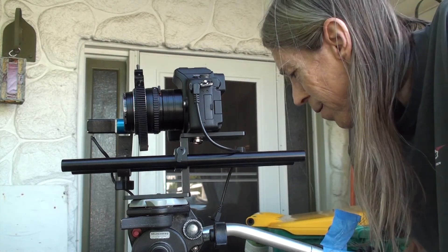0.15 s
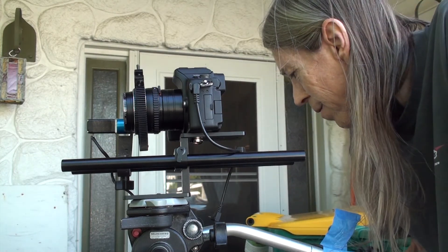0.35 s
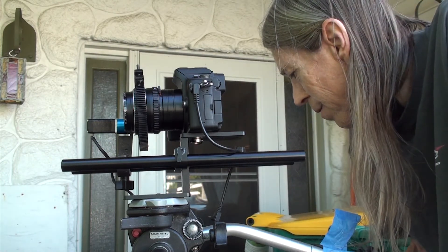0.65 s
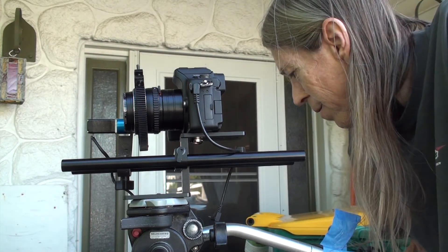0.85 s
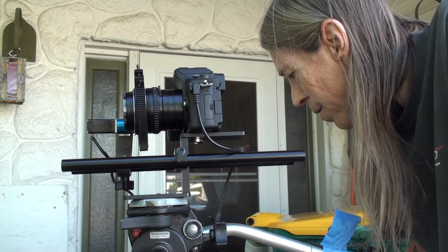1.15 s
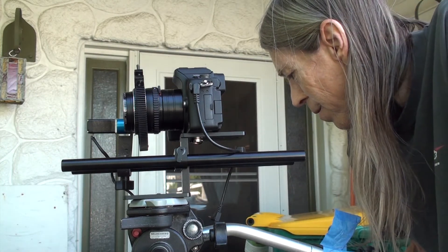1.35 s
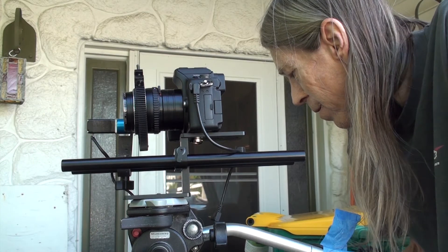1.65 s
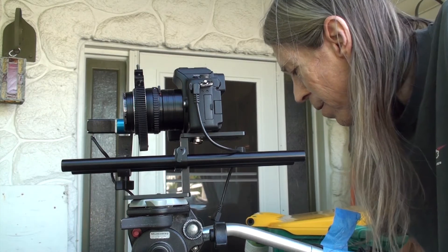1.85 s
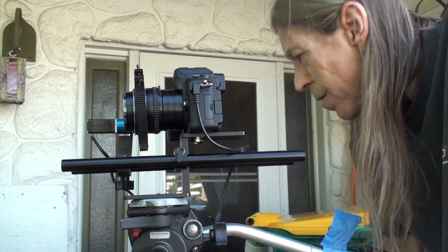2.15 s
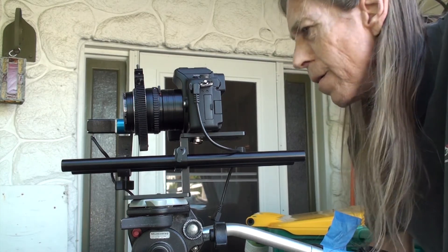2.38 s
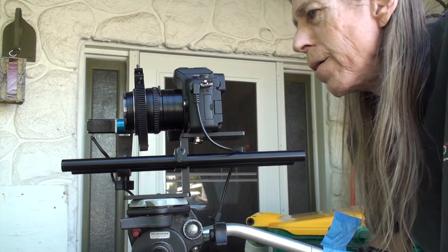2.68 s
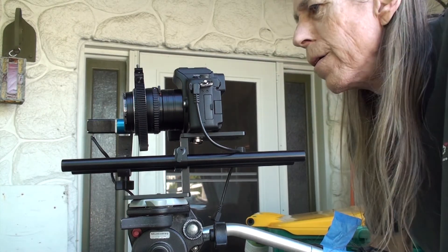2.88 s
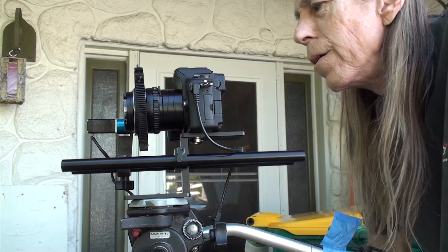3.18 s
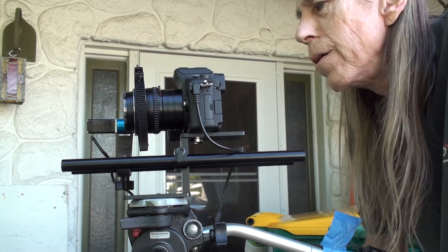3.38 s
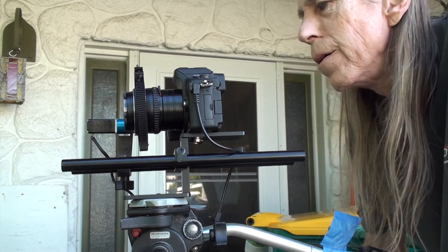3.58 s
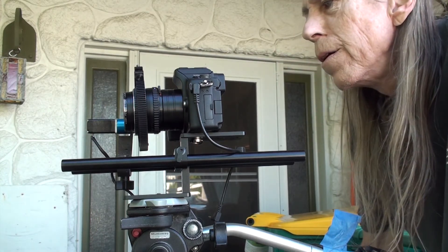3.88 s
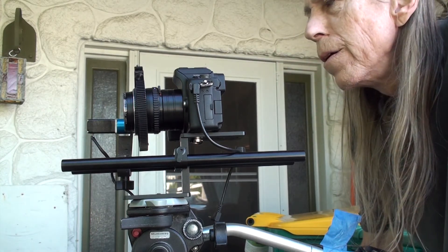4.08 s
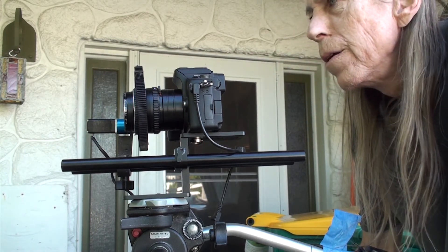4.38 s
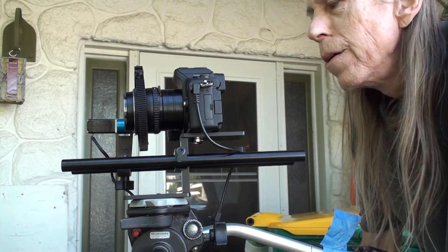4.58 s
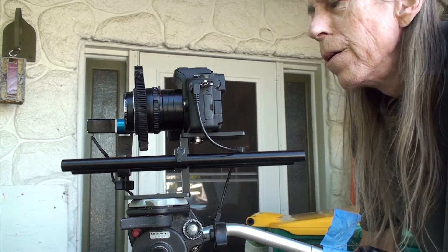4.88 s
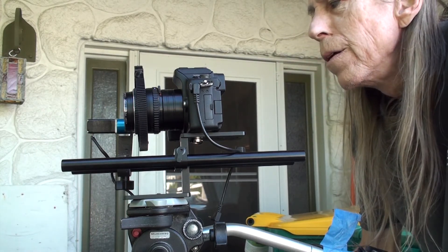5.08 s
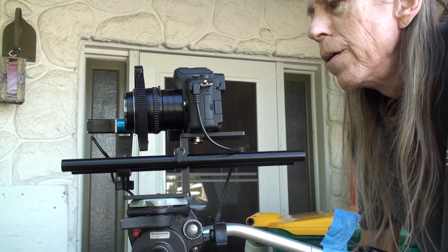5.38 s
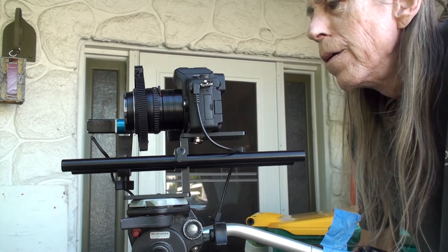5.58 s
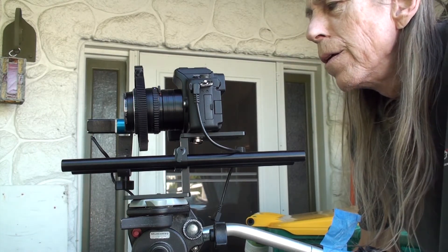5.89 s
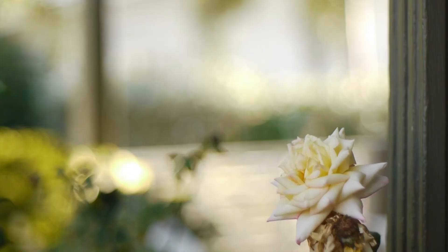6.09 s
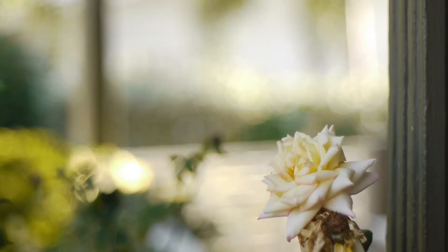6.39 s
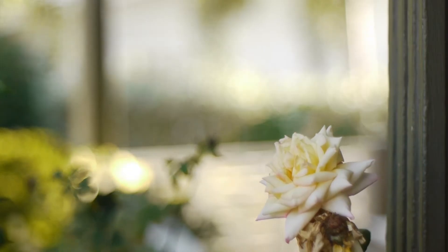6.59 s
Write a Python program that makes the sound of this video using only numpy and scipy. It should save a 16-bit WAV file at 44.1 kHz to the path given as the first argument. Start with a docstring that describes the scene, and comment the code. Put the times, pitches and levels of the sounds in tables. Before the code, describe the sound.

Two small button clicks close by, then a stepper motor whirs with a buzzing, ratcheting whine against soft outdoor air, stopping dead.

```python
"""Lens focus motor on a porch

Close up in stereo, a small button clicks twice; its spring snaps, its case knocks and a near wall answers.
Then a stepper motor turns the focus ring of a camera lens, 52 steps a second. The rig hums on multiples of
that rate, and each step knocks the gear teeth, which rebound in their play and ring the lens barrel.
Outdoor air, puffs of breeze and a faint distant whine of wavering tones lie behind; all stops at once."""
import sys
import numpy as np
from scipy import signal
from scipy.fft import rfft, irfft, next_fast_len
from scipy.io import wavfile
from scipy.ndimage import map_coordinates

SR = 44100
rng = np.random.default_rng(int(sys.argv[2]) if len(sys.argv) > 2 else 0)


def dump_mix(stems):
    """Bounce the given channels to the path in sys.argv[1] as a 16-bit WAV at rate SR."""
    frames = np.atleast_2d(stems).T  # one column per channel
    limited = np.clip(frames, -1, 1)  # hard clip at full scale
    pcm = np.round(limited * 32767).astype(np.int16)
    wavfile.write(sys.argv[1], SR, pcm)


N = 297480

# outdoor hiss spectrum: (frequency [Hz], relative level [dB])
AIR_SPECTRUM = [(20, -14.5), (55, 0.5), (115, 0), (230, -6), (480, -7.5), (900, -8.5), (1300, -13),
                (3000, -16), (6900, -17), (9000, -22), (10800, -27), (11700, -24), (13200, -26.5),
                (14200, -36)]
# low outdoor rumble spectrum: (frequency [Hz], relative level [dB])
RUMBLE_SPECTRUM = [(20, -14.5), (52, 5.5), (80, 0.0), (160, -41)]
# faint distant tones: (frequency [Hz], level [dB], rate of wavering [knots/s])
WHINE_TONES = [(689.8, -64.5, 9), (676, -65.5, 14), (588, -77.5, 10), (512.6, -73.5, 8), (1498, -76.5, 10),
               (204.2, -72, 8), (151.9, -72, 6), (120.9, -69, 8)]
# puffs of breeze on the microphones: (time [s], length [s], level [dB])
BREEZE_PUFFS = [(1.38, .1, -56.5), (1.65, .06, -57), (3.51, .08, -57), (3.85, 0.16, -64),
                (4.72, .14, -60.5), (5.49, .05, -58), (5.89, .06, -51.5)]
# spectrum of a puff: (frequency [Hz], relative level [dB])
PUFF_SPECTRUM = [(20, -10.5), (52, 5.5), (90, -3), (180, -36)]
# stereo width before each source's own offset: (frequency [Hz], side against mid [dB])
STEREO_WIDTH = [(30, -23.5), (100, -35), (300, -19.5), (700, -13.5), (3000, -10.5), (5500, -20),
                (9000, -17.5), (10800, -2.5), (11700, -47)]
# button going down and coming up: (time [s], snap gain [dB], knock gain [dB])
BUTTON_MOVES = [(0.1140, -31, -40), (0.3825, -70, -39.5), (0.9967, -31.5, -41), (1.1240, -72, -41)]
# modes of the button's spring: (frequency [Hz], relative level [dB], decay by 60 dB [s])
SPRING_MODES = [(3850, -11, .008), (4450, -6, .009), (5130, -2, .008), (5600, -1, .008), (6200, -6, .007),
                (6640, -4, .008), (6945, -1, .01), (10250, -13, .009), (10740, -9.5, .011),
                (11700, -10, .011), (12220, -7.5, .011), (12850, -9, .011)]
# mount throb at twice the step rate: (time [s], level [dB])
MOUNT_THROB = [(2.0, -65.5), (2.79, -63.5), (2.91, -74), (3.59, -54.5), (4.37, -57.5), (5.02, -55),
               (5.14, -61), (6.05, -57)]
# lines of the rig, before load and waver:
# (multiple of the step rate, level in first tone [dB], level in second tone [dB])
RIG_LINES = [(3, -63, -65), (4, -65, -65), (5, -66, -66), (8, -56.5, -57), (9, -59.5, -61.5),
             (10, -63.5, -61), (12, -64.5, -65), (13, -62, -65), (14, -70, -68), (16, -74, -72),
             (20, -72, -72), (23, -72, -72), (25, -73, -60.5), (26, -64, -69), (27, -74, -74),
             (30, -84, -68), (31, -68, -68), (32, -75, -69), (33, -72, -62.5), (34, -71, -68),
             (35, -70, -73), (36, -68, -64), (39, -76, -75), (41, -67, -71), (43, -74, -73), (46, -75, -80)]
# stiffness of the turning ring: (time [s], relative load on the teeth [dB], swell per tooth [dB])
RING_DRAG = [(2.0, -49, 1.5), (2.45, -50.5, -0.5), (2.65, -45.5, 1.5), (3.0, -52, 2.5), (3.21, -48.5, 1.5),
             (3.65, -54, 2.5), (3.99, -57, 3), (4.33, -54, 4.5), (4.46, -51, 2.5), (4.8, -51.5, 1.5),
             (5.0, -51, 3), (5.3, -50, 3.3), (5.42, -49, 0.5), (5.47, -44.5, 0.7), (6.08, -52, -1)]
# the teeth catch and scrape harder: (time [s], length [s], scrape level [dB], extra load [dB])
TOOTH_CATCHES = [(2.138, .09, -54, 4.5), (2.441, .023, -54.5, 1.5), (3.022, .06, -60, 0.5),
                 (3.236, .04, -52.5, 2.5), (3.333, .04, -57.5, 3), (3.68, .09, -58, 3)]
# spectrum of the scrape: (frequency [Hz], relative level [dB])
SCRAPE_SPECTRUM = [(1500, -24.5), (2500, -1), (3100, -10.5), (3600, 0), (4800, -1.5), (5450, 1),
                   (6300, -5.5), (8000, -14.5), (12000, -24)]
# tooth contacts within one step, before scatter: (delay [s], relative strength [dB])
TOOTH_CONTACTS = [(0, 0), (.0037, -3), (.0069, -5), (.0100, -10)]
# resonances of gear and lens barrel:
# (frequency [Hz], width [Hz], relative level in first tone [dB], relative level in second tone [dB])
BARREL_MODES = [(1263, 56, -2.5, 2.5), (1714, 140, -1, -1), (2133, 132, -1, -6), (2595, 73, -6.5, -10),
                (3650, 140, -11.5, -10), (4440, 110, -24, -13), (5330, 110, -9, -20.5)]
# gear resonances pinged by each step: (frequency [Hz], width [Hz], relative level [dB])
PING_MODES = [(3610, 230, 0), (4560, 500, -5.5)]
# spectrum of ticks and rub: (frequency [Hz], relative level [dB])
TICK_SPECTRUM = [(1500, -9.5), (2800, -2.5), (4500, -3.5), (6500, 1), (7900, 1.5), (8600, -6), (10600, -6),
                 (11900, -3), (13300, -7.5), (14200, -27), (16000, -23)]
# spectrum of the ring's thin high rub: (frequency [Hz], relative level [dB])
SIZZLE_SPECTRUM = [(9500, -51.0), (10900, -16), (11400, 0.5), (12300, -4.0), (13800, -40.5)]
# spectrum of the ring's soft grind: (frequency [Hz], relative level [dB])
GRIND_SPECTRUM = [(50, -19.5), (110, -6), (220, 2.5), (350, -2.5), (480, -6), (700, 1), (1000, -5),
                  (1500, -7.5), (3000, -22)]

STEP_HZ = 52.058
FIRST_STEP_S, STOP_S = 2.0042, 6.078
TOP_HZ = 15800
# stereo offsets added to the side level
AIR_WIDTH_DB, RIG_WIDTH_DB = 2.7, -3.5
# a new tooth engages at this rate; this is the time of one peak of its swell
TOOTH_HZ, TOOTH_PEAK_S = 2.5, 2.11
# reference loads, on the scale of RING_DRAG
USUAL_LOAD_DB, SLACK_LOAD_DB = -49.5, -55.5
# the motor's hum builds up after the start, and sags by this many dB per dB of load below slack
HUM_START_DB, HUM_BUILD_S, SAG_DB_PER_DB = -5, 0.18, .8
# partway round, the mesh passes from its first tone towards its second, up to this share
SHIFT_S, SHIFT_WIDTH_S, SECOND_SHARE = 3.93, 0.11, 0.85
# the share of clean tone grows as the mesh settles, and a little with load
CLEAN_SHARE, SETTLE_S, UNSETTLED_SHARE, CLEAN_GAIN_PER_DB = 0.65, .25, .25, 0.01
# ticks in each tone: base level at usual load before the layer trims, and dB gained per dB of load
TICK_DB, TICK_DB_PER_DB = -51.5, .6
SECOND_TICK_DB, SECOND_TICK_DB_PER_DB = -52.8, .3
# the ticks start softly while the gear takes up its play
TICK_START_DB, TICK_BUILD_S = -4, 0.025
# ping level at usual load, and dB gained per dB of load
PING_DB, PING_DB_PER_DB = -64.5, .6
# full sizzle level when slack, and the span of load over which it fades
SIZZLE_DB, SIZZLE_FADE_DB = -61.5, 1.5


def amp(db):
    """Decibels to gain."""
    return 10 ** (np.asarray(db) / 20)


def unit(x):
    """Scale to rms 1."""
    return x / np.sqrt(np.mean(x ** 2) + 1e-20)


def clock():
    """The time of each sample [s]."""
    return np.arange(N) / SR


def curves(rows):
    """One value per sample for each column after the time."""
    s, *columns = np.transpose(rows)
    return [np.interp(clock(), s, column) for column in columns]


def wobble(rate):
    """A smooth random curve, rate knots a second."""
    coarse = np.arange(0, N, 32) / SR
    knots = rng.standard_normal(int(N * rate / SR) + 4)
    return np.interp(clock(), coarse, map_coordinates(knots, [coarse * rate]))


def swell(s, length):
    """A smooth rise and fall around time s."""
    return np.exp(-2 * ((clock() - s) / length) ** 2)


def filtered(x, response):
    """x times a response of frequency."""
    m = next_fast_len(N + SR // 2)
    return irfft(rfft(x, m) * response(np.fft.rfftfreq(m, 1 / SR)), m)[..., :N]


def coloured(x, points):
    """x through a spectrum drawn in dB on a log frequency axis."""
    f, db = np.transpose(points)
    return filtered(x, lambda hz: amp(np.interp(np.log(hz + 1), np.log(f), db)))


def noise(points):
    """Steady noise of rms 1 with the given spectrum."""
    return unit(coloured(rng.standard_normal(N), points))


def resonate(x, modes):
    """x through parallel second-order resonances of alternating sign."""
    def response(f):
        """Sum of the resonances at frequencies f."""
        total = 0
        for k, (centre, width, db) in enumerate(modes):
            band = 1j * f * width
            total = total + (-1) ** k * amp(db) * band / (centre ** 2 - f * f + band)
        return total
    return filtered(x, response)


def air():
    """Outdoor hiss, a restless low rumble and a few distant tones wavering in level and phase."""
    hiss = amp(-51.5 + 0.42 * wobble(2.5)) * noise(AIR_SPECTRUM)
    rumble = amp(-68 + 3.3 * wobble(5.7)) * noise(RUMBLE_SPECTRUM)
    tones = np.zeros(N)
    for hz, db, rate in WHINE_TONES:
        level = amp(db) * unit(np.abs(2 + wobble(2 * rate)))
        tones += level * np.sqrt(2) * np.cos(2 * np.pi * hz * clock() + wobble(rate))
    return hiss + rumble + tones


def breeze(apart_db):
    """Soft low puffs of noise, partly different at each microphone."""
    both = noise(PUFF_SPECTRUM)
    apart = amp(apart_db) * noise(PUFF_SPECTRUM)
    level = sum(amp(db) * swell(s, length) for s, length, db in BREEZE_PUFFS)
    return level * np.array([both + apart, both - apart])


def spread(mid, width_db):
    """Scattered reflections differ slightly in phase between two close microphones."""
    scatter = rng.standard_normal(SR // 16)
    phase = np.angle(rfft(scatter, next_fast_len(N + SR // 2)))
    side = filtered(mid, lambda hz: np.exp(1j * phase))
    side = amp(width_db) * coloured(side, STEREO_WIDTH)
    return np.array([mid + side, mid - side]) * amp([[-.15], [.15]])


def porch(x, t60, wall_db, tail_db):
    """A near wall answers after 4 ms, then a short diffuse tail."""
    t = np.arange(SR // 4) / SR
    tail = rng.standard_normal(len(t)) * amp(-60 * t / t60) * (t > .004)
    answer = amp(tail_db) * tail / np.linalg.norm(tail)
    answer[round(.0042 * SR)] += amp(wall_db)
    return x + signal.fftconvolve(x, answer)[:N]


def button():
    """The spring snaps and rings, far louder on the way down; the plastic case knocks both ways."""
    out, t = np.zeros(N), np.arange(SR // 16) / SR

    def ring(hz, t60):
        """A dying sine of random phase."""
        return amp(-60 * t / t60) * np.sin(2 * np.pi * (hz * t + rng.random()))

    for s, snap_db, knock_db in BUTTON_MOVES:
        spring = sum(amp(db + rng.normal(0, 1)) * ring(hz, t60) for hz, db, t60 in SPRING_MODES)
        crack = amp(-7.5 - 60 * t / 0.011) * rng.standard_normal(len(t))
        case = ring(2130, .016) + .5 * ring(1750, .012)
        rise = 1 - np.exp(-t / .0007)
        move = amp(snap_db) * (spring + crack) + amp(knock_db) * case
        out[round(s * SR):][:len(t)] += rise * move
    return out


def running():
    """1 while the motor is driven, after a 2 ms rise."""
    return np.clip((clock() - FIRST_STEP_S) * 500 + 1, 0, 1)


def starting(life_s):
    """1 at the first step, dying away as the motor runs."""
    return np.exp(-np.maximum(clock() - FIRST_STEP_S, 0) / life_s)


def step_times():
    """The motor's steps, drifting 0.8 ms late as the gear takes up its slack."""
    starts = np.arange(FIRST_STEP_S, STOP_S, 1 / STEP_HZ)
    return starts + .0008 * (1 - np.exp((FIRST_STEP_S - starts) / .35))


def load():
    """Relative load on the teeth in dB: ring drag, a swell for every tooth and extra where one catches."""
    drag_db, swell_db = curves(RING_DRAG)
    catch_db = sum(extra_db * swell(s, length) for s, length, _, extra_db in TOOTH_CATCHES)
    return drag_db + swell_db * np.cos(2 * np.pi * TOOTH_HZ * (clock() - TOOTH_PEAK_S)) + catch_db


def second_tone(s):
    """Share of the mesh's second tone at times s."""
    return SECOND_SHARE / (1 + np.exp((SHIFT_S - s) / SHIFT_WIDTH_S))


def clean_share():
    """How much of the mesh sings rather than rattles."""
    settled = CLEAN_SHARE - UNSETTLED_SHARE * starting(SETTLE_S)
    return np.clip(settled + CLEAN_GAIN_PER_DB * (load() - USUAL_LOAD_DB), .01, .95)


def hum(waver_db, mesh_waver_db, slip, load_ref_db):
    """Clean multiples of the step rate: low ones from the motor, high ones swelling with tooth load."""
    load_db, mesh = load(), second_tone(clock())
    motor_db = HUM_START_DB * starting(HUM_BUILD_S)
    motor_db = motor_db - SAG_DB_PER_DB * np.maximum(SLACK_LOAD_DB - load_db, 0)
    sing_db = load_db - load_ref_db + 10 * np.log10(clean_share())
    steps = (clock() - FIRST_STEP_S) * STEP_HZ + slip * wobble(9)

    def line(order):
        """One multiple; the lines roughly agree in phase a few milliseconds after each step."""
        phase = rng.normal(0, 1.4) + .25 * wobble(7)
        return np.sqrt(2) * np.cos(2 * np.pi * order * (steps - .25) + phase)

    out = amp(curves(MOUNT_THROB)[0]) * line(2)
    for order, first_db, second_db in RIG_LINES:
        db = first_db + mesh * (second_db - first_db)
        if order < 18:
            db = db + motor_db + waver_db * wobble(5.4)
        else:
            db = db + sing_db + mesh_waver_db * wobble(8)
        out += amp(db) * line(order)
    return out


def bursts(times, sizes, t60):
    """A short dying puff of noise at each time, overlapping puffs adding in energy."""
    energy = np.bincount(np.round(np.ravel(times) * SR).astype(int), np.ravel(sizes) ** 2, N)[:N]
    fade = amp(-120 * np.arange(SR // 8) / SR / t60)  # energy, so twice 60 dB
    return np.sqrt(np.abs(signal.fftconvolve(energy, fade)[:N])) * rng.standard_normal(N)


def teeth(t60, scatter_db, rebound_db, late_rebound_db):
    """Every step throws a tooth against the next; it rebounds, softer and less punctual each time."""
    starts = step_times()[:, None]
    delay, db = np.transpose(TOOTH_CONTACTS)
    shape = (len(starts), len(delay))
    # timing scatter grows with the delay
    times = starts + (delay + .003) * (1 + .03 * rng.standard_normal(shape)) - .003
    mesh = second_tone(starts)
    rebounds_db = (rebound_db + mesh * (late_rebound_db - rebound_db)) * (delay > 0)
    sizes = amp(db + rebounds_db + scatter_db * rng.standard_normal(shape))
    return bursts(times, sizes, t60)


def rippled(x, t60, tail_db):
    """Adds a short random tail that gives the treble a fine uneven ripple."""
    t = np.arange(SR // 20) / SR
    tail = rng.standard_normal(len(t)) * amp(-60 * t / t60)
    return x + amp(tail_db) * signal.fftconvolve(x, tail / np.linalg.norm(tail))[:N]


def catches():
    """Where the teeth catch, every step rasps as a scrape of filtered noise."""
    level = sum(amp(db) * swell(s, length) for s, length, db, _ in TOOTH_CATCHES)
    rasp = teeth(t60=.007, scatter_db=1, rebound_db=-1, late_rebound_db=-1)
    return level * unit(coloured(rasp, SCRAPE_SPECTRUM))


def ping(scatter_db):
    """The first blow of every step, short and punctual, excites the gear's resonances."""
    starts = step_times()
    sizes = amp(scatter_db * rng.standard_normal(len(starts)))
    blows = np.bincount(np.round(starts * SR).astype(int), sizes, N)
    level_db = PING_DB + PING_DB_PER_DB * (load() - USUAL_LOAD_DB)
    return amp(level_db) * unit(resonate(blows, PING_MODES))


def sizzle():
    """While the teeth run slack the ring rubs with a thin high hiss, fading as load comes on."""
    level = amp(SIZZLE_DB) / (1 + np.exp((load() - SLACK_LOAD_DB) / SIZZLE_FADE_DB))
    return level * noise(SIZZLE_SPECTRUM)


def tick_level(load_db, mesh):
    """Base level of the ticks in dB: harder under load, by a law for each tone of the mesh."""
    over_db = load_db - USUAL_LOAD_DB
    first_db = TICK_DB + TICK_DB_PER_DB * over_db
    second_db = SECOND_TICK_DB + SECOND_TICK_DB_PER_DB * over_db
    return first_db + mesh * (second_db - first_db) + TICK_START_DB * starting(TICK_BUILD_S)


def gears():
    """Tooth knocks ring the barrel and tick brightly, over the rub, sizzle and soft grind of the ring."""
    load_db, mesh, clean = load(), second_tone(clock()), clean_share()
    tick_db = tick_level(load_db, mesh)
    knocks = teeth(t60=.007, scatter_db=.8, rebound_db=-1, late_rebound_db=3)
    first = unit(resonate(knocks, [(hz, width, db) for hz, width, db, _ in BARREL_MODES]))
    second = unit(resonate(knocks, [(hz, width, db) for hz, width, _, db in BARREL_MODES]))
    barrel = (1 - mesh) * first + mesh * second
    rattle = amp(load_db - 2.34) * np.sqrt(1 - clean) * barrel
    taps = teeth(t60=.007, scatter_db=1.0, rebound_db=-1, late_rebound_db=-5)
    taps = rippled(taps, t60=0.037, tail_db=-4.5)
    ticks = amp(tick_db - 6.5) * unit(coloured(taps, TICK_SPECTRUM))
    friction = rippled(rng.standard_normal(N), t60=0.12, tail_db=-6.5)
    rub = amp(tick_db - 4.0) * unit(coloured(friction, TICK_SPECTRUM))
    grind = amp(-55.5 + .7 * wobble(6.5)) * noise(GRIND_SPECTRUM)
    return rattle + ticks + rub + sizzle() + grind


def scene():
    """Air and breeze behind, button and motor close to the microphones."""
    background = spread(air(), AIR_WIDTH_DB) + breeze(apart_db=-10.5)
    clicks = porch(button(), t60=.14, wall_db=-12, tail_db=-4.5)
    rig_hum = hum(waver_db=1.0, mesh_waver_db=1.83, slip=0.0032, load_ref_db=-55.0)
    motor = running() * (rig_hum + catches() + ping(scatter_db=1.5) + gears())
    return background + spread(clicks + motor, RIG_WIDTH_DB)


def record(dry):
    """The sound is cut off abruptly over 5 ms; nothing lies above the band limit."""
    live = np.clip((STOP_S - clock()) * 200, 0, 1)
    return filtered(dry * live, lambda hz: hz < TOP_HZ)


dry = scene()
out = record(dry)
dump_mix(out)
```